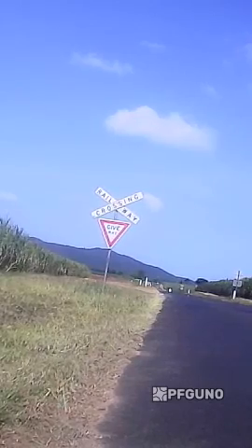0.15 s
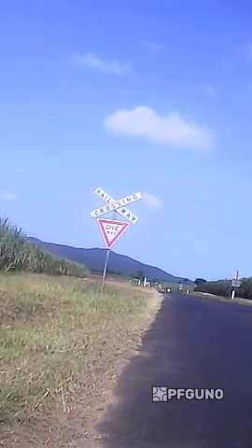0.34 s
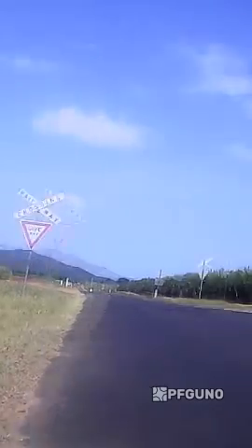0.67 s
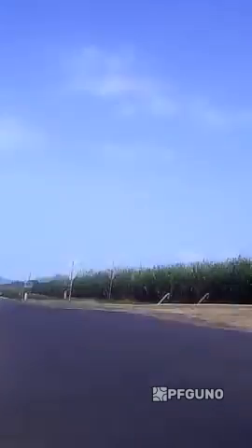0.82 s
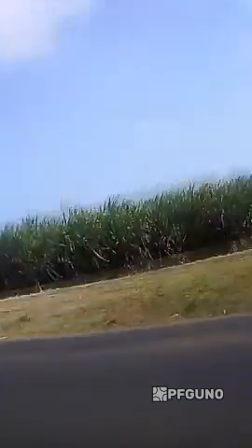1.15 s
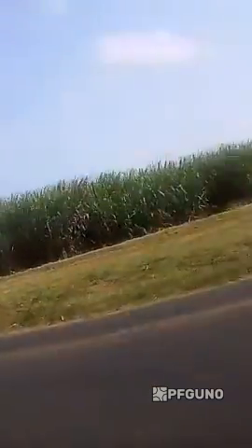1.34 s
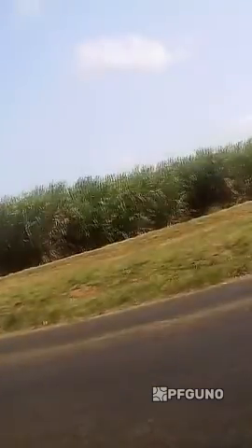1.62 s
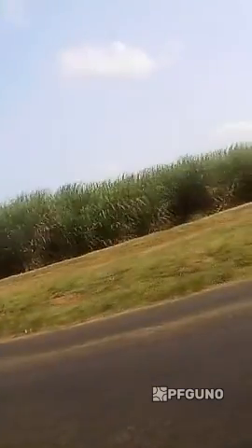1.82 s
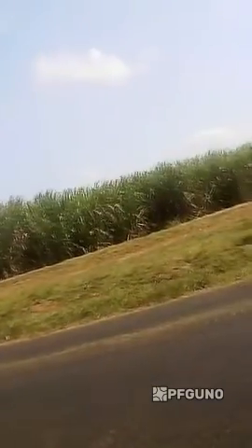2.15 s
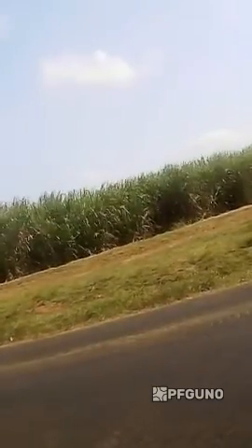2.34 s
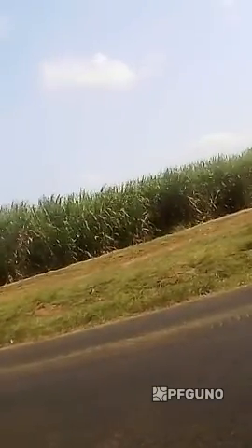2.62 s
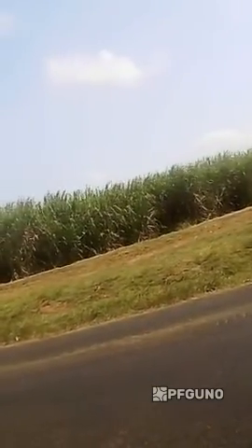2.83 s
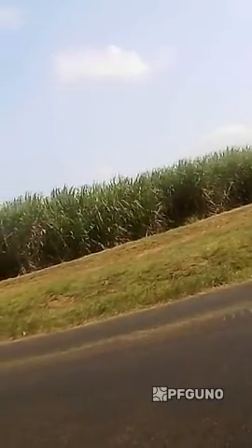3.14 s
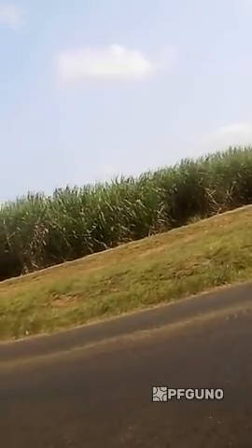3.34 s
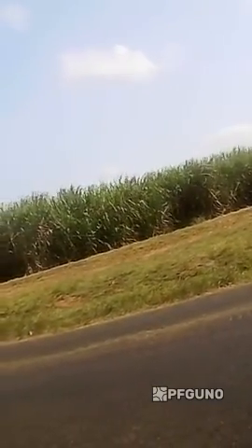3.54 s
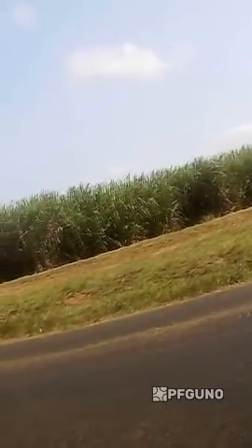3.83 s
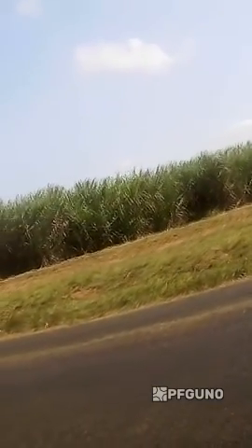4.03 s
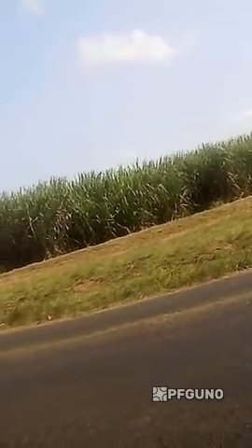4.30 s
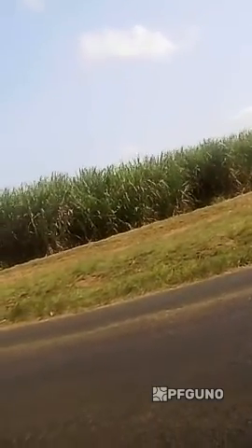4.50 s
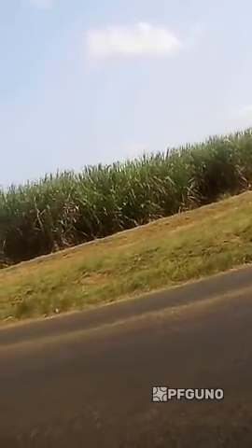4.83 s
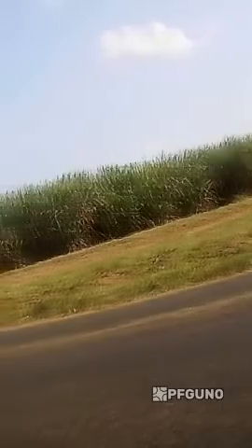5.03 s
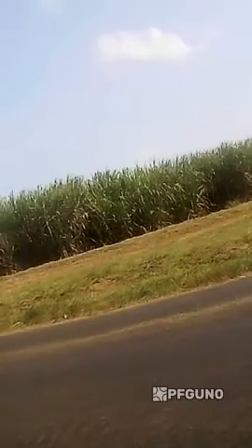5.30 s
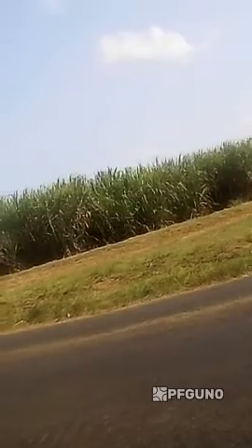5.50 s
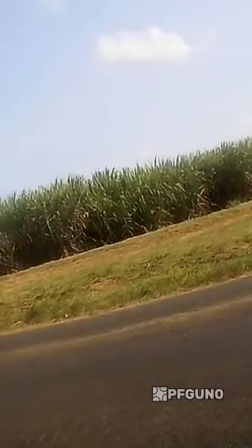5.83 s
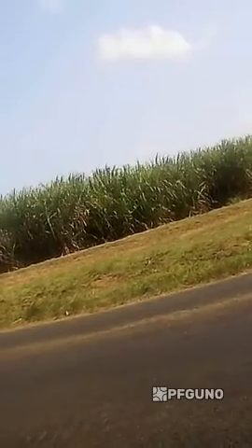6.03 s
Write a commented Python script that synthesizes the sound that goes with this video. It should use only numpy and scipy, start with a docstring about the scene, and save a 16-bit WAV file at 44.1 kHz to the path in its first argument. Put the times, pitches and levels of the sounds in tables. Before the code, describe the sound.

A small camera clamped to a bicycle picks up handling through its case, close, boxy and dull, outdoors. For the first second there is only low airy rumble, faint hiss and a thin steady whine around 700 Hz. From 1.0 to 1.9 s the bike is swung round: rapid hollow plastic ticks, deep soft thumps, rubbing and a faint tyre scuff, with two tiny rising squeaks near 1.4 s and a heavy thump at 1.86. A low metallic hum then rings, with a double thump at 2.2 and sparse light ticks at 2.7 and 3.7, nearly quiet between. Ticks gather from 4.0, with a firm jolt at 4.4 and rubbing and small knocks until 4.8. After a lull, sharp knocks and thumps cluster at 5.4-5.5; the hardest crack lands at 5.7. Thin pings and frame ringing linger past 6 s over the whine.

```python
"""A small camera clamped to a bicycle handlebar hears the bike through its case, over rumble, hiss and a faint whine.
From about 1 s the bike is swung round: shaped noise scuffs, forced mode banks tick and thump, two sweeps squeak.
From 1.9 s decaying sines let the fork, tube and spokes ring on, with sparse ticks and frame answers in between.
From 4.4 s, as it is leaned, jolts return and the hardest tick falls at 5.7 s; thin pings and rings linger.
Random slips driving the same modes give the handling; coloured noise and steady sines form the background."""
import sys
import numpy as np
from scipy import signal
from scipy.fft import rfft, irfft
from scipy.io import wavfile
from scipy.ndimage import uniform_filter1d

SR = 44100
rng = np.random.default_rng(int(sys.argv[2]) if len(sys.argv) > 2 else 0)


def wrap_up_sound(samples):
    """Save the sound to the file named by the first command line argument, as 16-bit audio."""
    columns = np.atleast_2d(samples).T
    # keep every value between -1 and 1, then stretch to whole-number steps
    tamed = np.clip(columns, -1, 1)
    steps = np.round(tamed * 32767).astype(np.int16)
    wavfile.write(sys.argv[1], SR, steps)


N = 271510

# Ticks on the case. Each row: start in seconds, peak in dB, centre of the blow in Hz, hollow knock in dB re the
# peak, bright edge in dB re the peak, decay time of the contact in ms.
CASE_TICKS = [(1.168, -31.5, 856, -6, -35, 9.7), (1.326, -15, 912, -21, -20.5, 3.2),
              (1.37, -16, 890, -8, -16.5, 4.5), (1.38, -24.5, 850, -7, -19, 4.2),
              (1.428, -27, 904, -9, -31, 4.5), (1.523, -26, 1430, -3, -11, 5),
              (1.646, -22.5, 1180, -16, -24, 2.9), (1.66, -27.5, 794, 5, -32.5, 7),
              (1.777, -19.5, 1450, -23, -11.5, 4.9), (1.785, -29, 900, -22, -11, 4.2),
              (1.825, -25, 1420, -25, -7.5, 3.2), (1.844, -25.5, 1380, -5.5, -11.5, 2.5),
              (1.861, -18.5, 1450, 2, -18.5, 8.6), (2.131, -43.5, 1470, -4, -27, 4.8),
              (2.226, -27, 1420, -1.5, -21, 7.8), (2.257, -35.5, 1450, -10, -26, 10),
              (2.292, -39.5, 1450, -12, -31, 3), (2.551, -36, 1040, -22, -40, 6.7),
              (2.62, -48.5, 859, 0, -25, 9.1), (2.712, -22, 902, -4, -25.5, 10.3),
              (2.765, -41, 902, -15, -27, 8.9), (3.134, -49, 786, -17, -26, 3.9),
              (3.18, -46.5, 1450, -17, -27, 7.6), (3.196, -36.5, 1460, -18, -26, 9.1),
              (3.524, -46.5, 1450, -1, -28, 9), (3.712, -25, 915, -5, -27, 10),
              (3.744, -34.5, 910, 1, -22, 8.8), (3.762, -38, 915, -28, -31, 18),
              (3.801, -47, 1410, 6, -28, 17), (3.999, -28, 1180, -2, -26, 14),
              (4.089, -39.5, 1370, -8, -25, 16), (4.149, -43.5, 743, 6.5, -32, 8.7),
              (4.272, -34, 1360, 2.5, -29, 15), (4.293, -22.5, 1390, -0.5, -33, 11),
              (4.411, -21, 1270, -3, -34, 5.9), (4.499, -34.5, 859, -16, -33, 3.3),
              (4.523, -35.5, 1460, -18, -18.5, 12.6), (4.643, -37, 1410, 4.5, -35, 8.5),
              (4.716, -32, 1100, -25, -20.5, 14), (4.775, -37, 1400, -19, -39.5, 2.6),
              (5.155, -49.5, 1460, 0, -23, 9), (5.255, -38, 1450, -13, -41, 11),
              (5.314, -42, 1420, -5, -30, 5.8), (5.414, -28, 1140, -5.5, -43, 11),
              (5.424, -11.5, 1360, -2, -28, 4.1), (5.441, -19.5, 1080, -1.5, -45, 6.2),
              (5.474, -28.5, 1440, -6, -19, 3.6), (5.514, -23, 1410, 7.5, -41, 1.6),
              (5.522, -27, 1400, -6, -20.5, 6.3), (5.688, -4.5, 870, 3.5, -22, 1.46),
              (5.695, -24, 1700, 13.5, -13, 9.4), (5.709, -30.5, 1700, -14.5, -7.5, 2.5)]
# Jolts of the whole bike. Each row: start in seconds, peak of the mount thump in dB, mount swing in Hz,
# frame answer in dB re the thump, centre of the frame answer in Hz.
BIKE_JOLTS = [(1.016, -19, 42.2, -12, 199), (1.169, -23.5, 70, -13.5, 92), (1.259, -23.5, 56, -9, 161),
              (1.327, -14.5, 66, -8, 92), (1.355, -21, 32.6, -3, 92), (1.382, -17, 40.6, -17, 92),
              (1.418, -18, 71.4, -7.5, 92), (1.467, -37, 70, 13.5, 92), (1.529, -18.5, 29.6, -2.5, 104),
              (1.655, -18.5, 57.4, 7, 124), (1.694, -20, 70, 0, 92), (1.737, -25, 34.7, -6, 137),
              (1.781, -20, 47.6, -3, 92), (1.863, -8.5, 36.8, -15, 97), (1.908, -28, 26.8, 8, 143),
              (2.221, -18.5, 30.6, -3.5, 90), (2.235, -15, 40.4, -2.5, 92), (3.517, -44, 27, 4, 92),
              (3.76, -47, 27, 13.5, 98), (3.999, -45.5, 27, 8, 103.6), (4.13, -46, 27, 15.5, 108.6),
              (4.293, -41.5, 70, 23.5, 105), (4.398, -12, 62.8, -1.5, 194), (4.498, -32.5, 56, 7.5, 128),
              (4.639, -31.5, 70, 12.5, 97), (4.77, -34, 70, 5, 91.5), (5.417, -16, 33, 0, 192),
              (5.442, -11.5, 48.2, -0.5, 188), (5.512, -8, 38.5, -6.5, 250), (5.535, -16.5, 56, -0.5, 261),
              (5.688, -8, 42, -6, 94), (5.709, -12, 55, -1, 170)]
# Free ringing once the bike is let go. Each row: start in seconds, damped at seconds, then the gains in dB
# on the fork, tube and spoke modes.
FREE_RINGS = [(1.915, 2.22, -28.5, -45.5, -57), (2.26, 2.7, -29, -47, -60.5), (2.729, 3.205, -43, -63, -60),
              (4.418, 4.705, -27.5, -50.5, -55), (4.721, 5.27, -35, -44.5, -58.5),
              (5.531, 5.689, -31.5, -28, -50.5), (5.757, 6.252, -27.5, -30.5, -40.5)]
# Squeaks of a grip. Each row: start in seconds, length in seconds, from Hz, to Hz, peak in dB.
GRIP_SQUEAKS = [(1.391, .022, 520, 680, -27), (1.419, 0.02, 750, 984, -29)]
# Thin metal parts singing after ticks. Each row: start in seconds, frequency in Hz, level in dB, t60 in seconds.
METAL_PINGS = [(2.72, 1110, -54.5, 0.81), (3.72, 1123, -54, 0.76), (5.52, 1327, -46, 0.53),
               (5.531, 1414, -43, 0.37), (5.801, 905, -60, 1.3)]
# Hands and tyres at work. Each row: time in seconds, push on the frame in dB, dull rub on the case in dB.
HANDLING_LEVELS = [(0.85, -71.5, -81.5), (1.05, -39.5, -50), (1.18, -35, -45), (1.27, -34, -47),
                   (1.356, -30.5, -40.5), (1.53, -30.5, -46.5), (1.93, -31, -48.5), (2.03, -46.5, -63),
                   (2.2, -47.5, -67), (2.225, -38, -56), (2.36, -43, -64.5), (2.79, -58, -63.5),
                   (2.96, -74, -76.5), (3.2, -51.5, -61.5), (3.68, -61.5, -71.5), (3.98, -63.5, -67.5),
                   (4.01, -42.5, -51), (4.16, -47, -47.5), (4.28, -45, -49), (4.38, -41, -53),
                   (4.55, -33.5, -55.5), (4.634, -33, -44.5), (4.86, -46.5, -64.5), (5.2, -55, -72),
                   (5.4, -45.5, -59), (5.43, -29.5, -37), (5.58, -27.5, -53), (5.82, -32, -54.5),
                   (5.92, -42, -62.5), (6.157, -53.5, -70.5)]
# Tyre scuff as the bar swings. Each row: time in seconds, level in dB.
SCUFF_LEVELS = [(0.9, -86), (1.03, -60.5), (1.414, -53.5), (1.65, -65), (1.844, -63.5), (1.96, -89)]

# Resonant modes. Each row: frequency in Hz, relative level in dB, t60 in seconds.
HOLLOW_MODES = [(458.6, -1.5, 0.041), (517.5, 0, 0.073), (593, -5, 0.11)]  # hollow body of the case
SHELL_MODES = [(765, 2.5, 0.012), (897, 0, 0.035), (1047, 0.5, 0.028), (1157, -2, 0.028), (1320, 3, 0.02),
               (1401.3, 0, 0.056), (1620, -23, 0.027), (1680, -29.5, 0.042), (2204, -9.5, 0.059)]  # shell of the case
EDGE_MODES = [(2410, 5.5, 0.014), (2950, 5, 0.031), (3556, 18.5, 0.0054), (4180, 2, 0.029),
              (4810, -16, 0.023), (6200, -24.5, 0.004), (9000, -24.5, .005)]  # bright edge of the case
MOUNT_MODES = [(33.3, -2, 0.088), (62.8, -3.5, 0.13)]
FRAME_MODES = [(85.4, -1.5, 0.27), (98.67, 1.5, 0.37), (122.6, -2.5, 0.15), (146.1, 2.5, 0.14),
               (184.3, 4, 0.2), (245.1, 1, 0.15), (266.4, -4, 0.12), (303.2, -1, .12), (370.5, -6, 0.09)]  # t60 of the held frame
FORK_MODES = [(58.05, -2.5, 1.3), (142.5, -10, 1.8)]
TUBE_MODES = [(245.4, -1.5, 3.54), (288, -25.5, 0.33)]
SPOKE_MODES = [(430, -6, 1.2), (439, 0, 0.58), (463, -8, 2.2), (517, 4.5, 0.4), (493, -3, 2.8),
               (545, -10.5, 2), (563, -1, 1.82), (587, -10, 1.3)]

# Colour of the tyre scuff. Each row: frequency in Hz, relative spectral level in dB.
SCUFF_COLOUR = [(1500, -9.5), (1900, -1), (2350, 2), (2800, -13.5), (3400, -10), (3900, -18.5), (4250, -11),
                (4700, -20.5), (5300, -16.5), (6000, -31.5), (8000, -44.5)]
# Colour of the outdoor rumble and hiss. Each row: frequency in Hz, relative spectral level in dB.
AIR_COLOUR = [(20, -0.5), (54, -6), (78, -8.5), (125, -3.5), (225, -19), (320, -21), (400, -28), (700, -29),
              (1000, -36), (1400, -35.5), (2000, -39.5), (4000, -42.5), (6300, -47), (8000, -57.5),
              (10000, -66.5), (12000, -82)]
# Harmonics of the electrical whine. Each row: frequency in Hz, level in dB rms.
WHINE_HARMONICS = [(705.2, -73.5), (1410, -80.5), (2116, -88.5)]

# The hollow knock sits low for hard ticks and higher for light ones.
KNOCK_HZ, KNOCK_OCTAVES_PER_DB = 427.7, 0.008  # at a peak of 0 dB; rise for each dB less
EDGE_RATIO = 2.6  # centre of the bright edge over the centre of the blow
CONTACT_RISE = 0.05  # build-up time over the decay time of the contact
MOUNT_T60_S = 0.1  # of a jolted mount
# A jolted frame's t60 over that of a held one: at equal frame and thump, and more for each dB of frame.
JOLT_RING, JOLT_RING_PER_DB = 1.1, 0.05
THIN_DB = -2  # thin rub on the shell, re the dull rub
AIR_DB = -51  # rms
OFFSET, TOP_HZ = 0.0078, 11900  # constant shift ahead of the low-pass; edge of its passband


def ticks():
    """Impact excitation: a short rough contact knocks the hollow case, rings its shell and snaps brightly."""
    out = np.zeros(N)
    t = np.arange(int(0.04 * SR)) / SR
    grit = rng.standard_normal((len(CASE_TICKS), len(t)))
    for (start, db, centre_hz, hollow_db, edge_db, ms), rough in zip(CASE_TICKS, grit):
        hollow_hz = KNOCK_HZ * 2 ** (-db * KNOCK_OCTAVES_PER_DB)
        edge_hz = EDGE_RATIO * centre_hz
        fade = np.exp(-1000 * t / ms)
        rise = 1 - np.exp(-1000 * t / (ms * CONTACT_RISE))
        contact = rough * rise * fade
        push = np.exp(-t / 0.00034) + 0.044 * contact  # the hollow body feels mostly the first push
        snap = contact * fade ** 0.48  # the bright part fades sooner

        hollow = ring(HOLLOW_MODES, 0.15, reach(HOLLOW_MODES, hollow_hz, 50))
        shell = ring(SHELL_MODES, 0.4, reach(SHELL_MODES, centre_hz, 16.7))
        edge = ring(EDGE_MODES, 0.04, reach(EDGE_MODES, edge_hz, 20))
        add_peak(out, start, excite(band(push, 274, 800), hollow), db + hollow_db)
        add_peak(out, start, excite(band(contact, 695, 1977), shell), db)
        add_peak(out, start, excite(band(snap, 1200, 6900), edge), db + edge_db)
    return out


def jolts():
    """Transient response: a smooth push swings the camera on its mount, either way, and the frame answers."""
    out = np.zeros(N)
    chance = rng.standard_normal((len(BIKE_JOLTS), len(FRAME_MODES) + 1, 1))
    for (start, db, swing_hz, frame_db, centre_hz), draw in zip(BIKE_JOLTS, chance):
        thump = np.sign(draw[0]) * ring([(swing_hz, 0, MOUNT_T60_S)], 0.4)
        stretch = max(JOLT_RING + JOLT_RING_PER_DB * frame_db, 0.3)
        modes = np.array(FRAME_MODES) * [1, 1, stretch]
        scatter = np.sign(draw[1:]) * undb(2.0 * draw[1:])  # each mode's sign and level vary
        frame = ring(modes, 0.6, scatter * reach(FRAME_MODES, centre_hz, 7.6))
        add_peak(out, start, soften(thump, 230), db)
        add_peak(out, start, soften(frame, 600), db + frame_db)
    return out


def free_rings():
    """Free decay: metal modes swell after a release, waver as loose parts touch them and die at the next grip."""
    out = np.zeros(N)
    for modes, waver_db, column in ((FORK_MODES, 1.5, 2), (TUBE_MODES, 1.2, 3), (SPOKE_MODES, 5.0, 4)):
        waver = undb(waver_db * np.array([walk(9) + 0.77 * walk(45) for _ in modes]))
        for row in FREE_RINGS:
            start, length = row[0], row[1] - row[0]
            t = np.arange(int(length * SR)) / SR
            places = int(start * SR) + np.arange(len(t))
            sound = ring(modes, length, np.take(waver, places, axis=1, mode="clip"))
            swell = (1 - np.exp(-t / 0.018)) ** 2
            damping = 1 - np.exp((t - t[-1]) / 0.027)
            add(out, start, undb(row[column]) * sound * swell * damping)
    return out


def squeaks():
    """Stick-slip friction: short tones of rising frequency."""
    out = np.zeros(N)
    for start, length, from_hz, to_hz, db in GRIP_SQUEAKS:
        hz = np.linspace(from_hz, to_hz, int(length * SR))
        phase = 2 * np.pi * np.cumsum(hz) / SR
        add(out, start, undb(db) * np.hanning(len(hz)) * np.sin(phase))
    return out


def pings():
    """Lightly damped resonance: each thin metal part sings as one decaying sine."""
    out = np.zeros(N)
    for start, *mode in METAL_PINGS:
        add(out, start, ring([mode], 0.79))
    return out


def handling():
    """Friction as many small slips: hands and tyres keep the frame shaking, rub the case and scuff."""
    push, dull = curves(HANDLING_LEVELS)
    swing = curves(SCUFF_LEVELS)[0]
    nudges = soften(grains(800, 1.9) * undb(3.33 * walk(25)), 500)
    slips = grains(2500, 0.93) * undb(2.2 * walk(30))

    bike = ring(MOUNT_MODES, 0.4) + undb(0.5) * ring(FRAME_MODES, 0.4) + undb(-7) * ring(FORK_MODES, 0.4)
    case = ring(SHELL_MODES, 0.1) + undb(-1.5) * ring(HOLLOW_MODES, 0.1)
    shaking = push * level(excite(nudges, bike), 0)
    dull_rub = dull * level(excite(band(slips, 380, 1170), case), 0)
    thin_rub = dull * undb(THIN_DB) * level(excite(band(slips, 1203, 1584), case), 0)
    scuff = irfft(coloured(SCUFF_COLOUR), N) * undb(2.2 * walk(40))
    return shaking + dull_rub + thin_rub + swing * level(scuff, 0)


def air():
    """Broadband noise: far rumble and hiss, of which the bass wavers more than the treble."""
    spectrum = coloured(AIR_COLOUR)
    low_share = 1 / (1 + (np.fft.rfftfreq(N, 1 / SR) / 350) ** 4)
    bass = irfft(spectrum * low_share, N) * undb(1.5 * walk(12.0))
    treble = irfft(spectrum * (1 - low_share), N) * undb(0.31 * walk(3.4))
    return level(bass + treble, AIR_DB)


def whine():
    """Harmonic series: thin tones of the electronics at steady level, their phases wavering together."""
    t = np.arange(N) / SR
    wobble = 0.3 * walk(7.0)  # radians at the first harmonic
    out = np.zeros(N)
    for k, (hz, db) in enumerate(WHINE_HARMONICS, 1):
        out += np.sqrt(2) * undb(db) * np.sin(2 * np.pi * hz * t + k * wobble)
    return out


def ring(modes, length, gains=1.0):
    """Modal superposition: the decaying sines that answer one sharp blow."""
    hz, db, t60 = np.array(modes).T[:, :, None]
    t = np.arange(int(length * SR)) / SR
    decay = np.exp(-np.log(1000) * t / t60)
    return np.sum(gains * undb(db) * decay * np.sin(2 * np.pi * hz * t), axis=0)


def reach(modes, centre_hz, fall_db):
    """Selective excitation: a blow drives modes near its centre most, fall_db less for each octave away."""
    hz = np.array(modes)[:, :1]
    return undb(-fall_db * np.abs(np.log2(hz / centre_hz)))


def excite(force, response):
    """Linear superposition: a force convolved with the response of what it strikes."""
    return signal.fftconvolve(force, response)[:N]


def grains(rate, scatter_db):
    """Random (Poisson-like) slips: rate per second, very uneven in size."""
    hit = rng.random(N) < rate / SR
    size = rng.exponential(size=N)
    return hit * undb(scatter_db * size) * rng.standard_normal(N)


def soften(x, hz):
    """Low-pass filtering: soft contacts and the closed case let little through above hz."""
    return signal.sosfilt(signal.butter(4, hz, fs=SR, output="sos"), x)


def band(x, low_hz, top_hz):
    """Band-pass filtering: soft contacts and the closed case pass only a band."""
    return signal.sosfilt(signal.butter(3, (low_hz, top_hz), "bandpass", fs=SR, output="sos"), x)


def coloured(points):
    """Spectral shaping: the spectrum of white noise weighted by (Hz, dB) points."""
    hz, db = np.transpose(points)
    f = np.fft.rfftfreq(N, 1 / SR)
    return rfft(rng.standard_normal(N)) * undb(np.interp(np.log(f + 1), np.log(hz), db, left=-90))


def walk(rate):
    """Slow random modulation: values held for 1 / rate seconds and smoothed twice."""
    k = int(SR / rate)
    held = np.repeat(rng.standard_normal(N // k + 1), k)
    return 1.51 * uniform_filter1d(uniform_filter1d(held, k), k)[:N]


def curves(table):
    """Envelopes: columns of dB interpolated into gains over time, -120 dB outside."""
    s, *columns = np.transpose(table)
    t = np.arange(N) / SR
    return [undb(np.interp(t, s, c, left=-120, right=-120)) for c in columns]


def undb(db):
    """Logarithmic level: decibels to amplitude gain."""
    return 10 ** (np.asarray(db) / 20)


def level(x, db):
    """Effective value: scale x to an rms level in dB."""
    return x * undb(db) / np.sqrt(np.mean(x ** 2))


def add(out, start, x):
    """Superposition: mix x into out from start seconds on."""
    i = int(start * SR)
    out[i:i + len(x)] += x[:len(out) - i]


def add_peak(out, start, x, peak_db):
    """Superposition at a set peak: scale x to peak_db and mix it in."""
    add(out, start, x * undb(peak_db) / np.abs(x).max())


def scene():
    """Superposition of all sources at one microphone."""
    return (ticks() + jolts() + free_rings() + squeaks() + pings() + handling() + air() + whine())[None]


def record(dry):
    """Saturation and band limiting: the input rounds peaks near full scale, sits off zero and cuts the top."""
    rounded = dry / (1 + (dry / 0.98) ** 6) ** (1 / 6)
    low_pass = signal.ellip(8, 0.2, 70, TOP_HZ, fs=SR, output="sos")
    return signal.sosfilt(low_pass, rounded + OFFSET)


dry = scene()
out = record(dry)
wrap_up_sound(out)
```